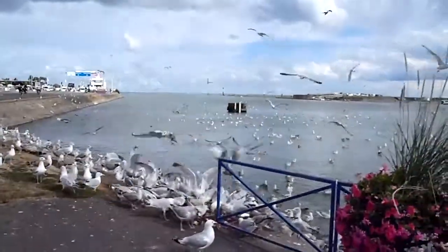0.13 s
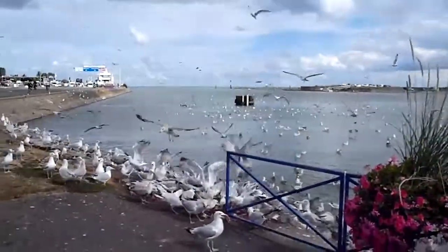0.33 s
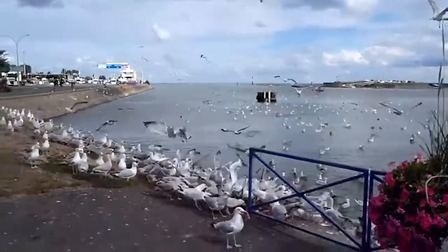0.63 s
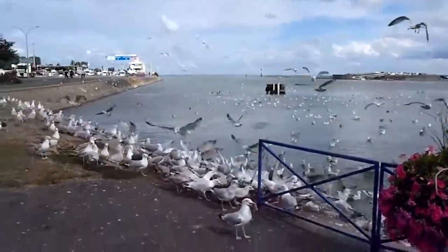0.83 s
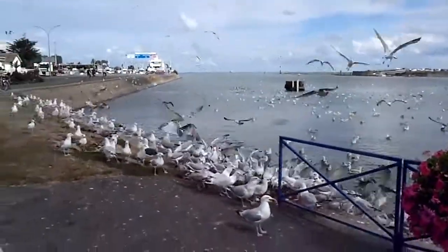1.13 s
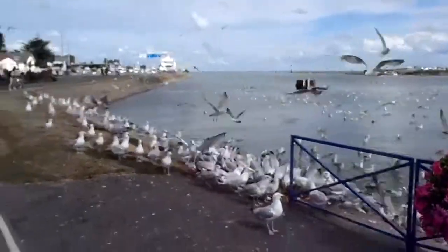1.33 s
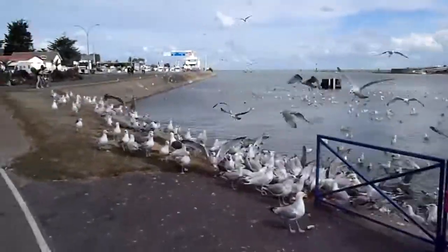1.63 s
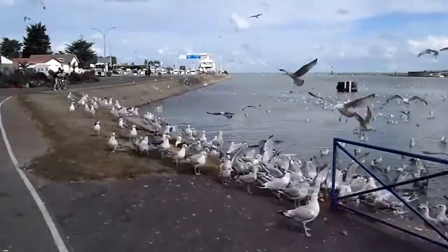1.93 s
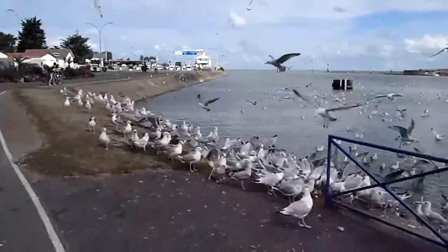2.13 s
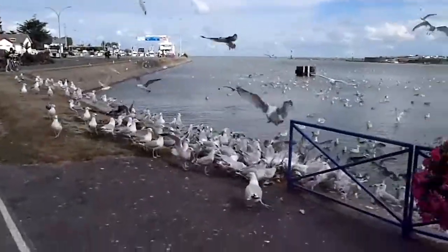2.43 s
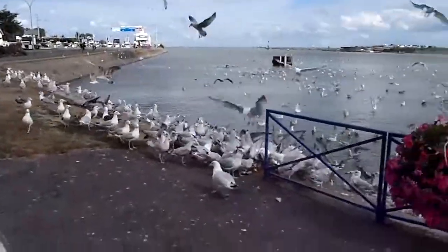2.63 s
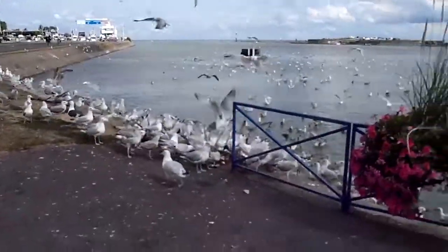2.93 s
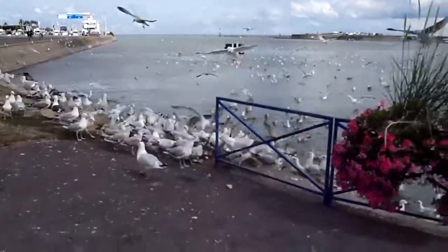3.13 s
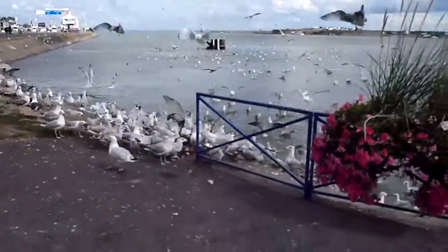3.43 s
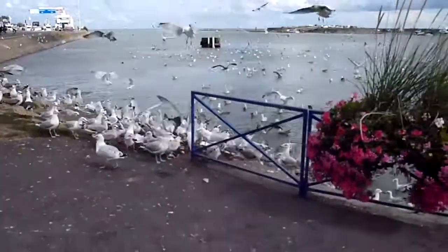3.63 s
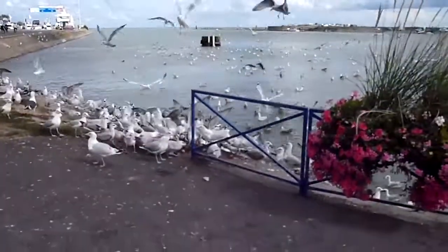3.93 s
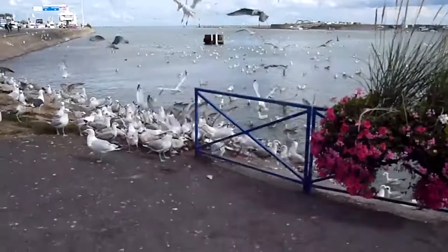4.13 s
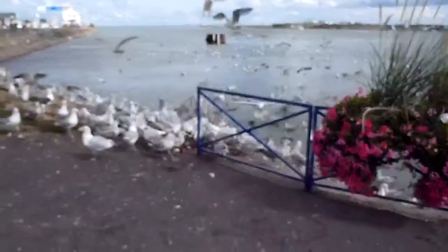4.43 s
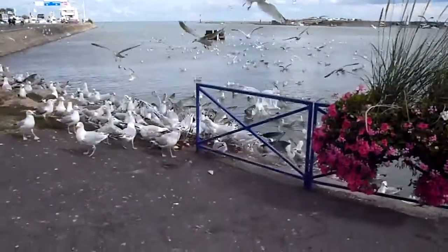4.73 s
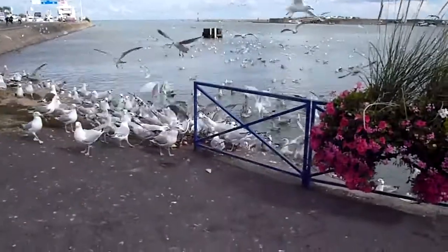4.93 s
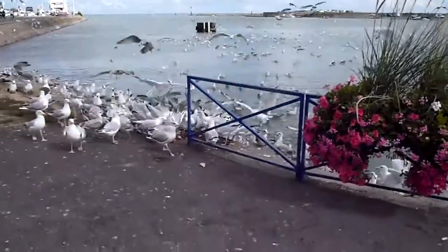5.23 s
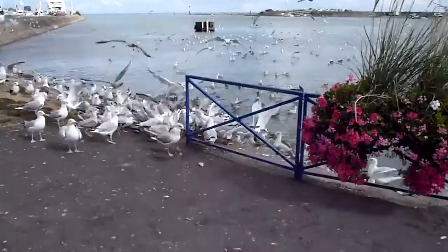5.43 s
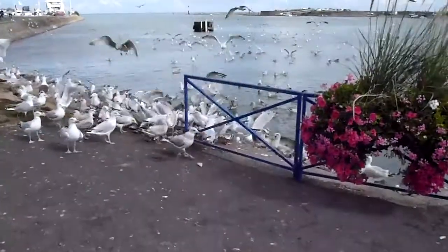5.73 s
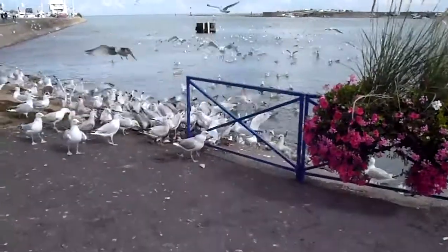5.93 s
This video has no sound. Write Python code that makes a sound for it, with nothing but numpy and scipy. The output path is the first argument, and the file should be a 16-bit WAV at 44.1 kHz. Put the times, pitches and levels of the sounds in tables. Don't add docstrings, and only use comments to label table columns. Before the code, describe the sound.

A dense gull flock calls without pause on an open quay. Very short, raspy squawks and yaps burst from birds a few metres away, mixed with arching whistles and nasal squeals, over a seething bed of many more birds. The sound is bright and piercing. Light wind bumps softly at a small camera microphone, with faint hiss and tiny ticks; only a slight echo comes off the asphalt.

```python
import sys
import numpy as np
from scipy import signal
from scipy.fft import rfft, irfft
from scipy.io import wavfile
from scipy.ndimage import uniform_filter1d

SR = 44100
rng = np.random.default_rng(int(sys.argv[2]) if len(sys.argv) > 2 else 0)


def invert_db(x):
    u = np.asarray(x, float) / 20
    return 10 ** u


def persist_wave(psi):
    counts = np.round(np.clip(psi, -1, 1) * 32767).astype(np.int16)
    wavfile.write(sys.argv[1], SR, np.atleast_2d(counts).T)


N = 267951

# (frequency [Hz], level [dB per Hz])
COLOUR = [(750, -51), (1000, -28), (1200, -24), (1830, -14), (2500, -8), (2900, -5.5), (3180, 3),
          (3400, -5), (3800, -15.5), (4250, -30.5), (4900, -20), (5400, -31.5), (6500, -39.5), (8200, -54),
          (14000, -78.5)]


def evened(x):
    return x / np.sqrt(np.mean(x ** 2) + 1e-20)


def read(points, hz):
    f, value = np.transpose(points)
    return np.interp(np.log(hz + 1), np.log(f + 1), value)


def add(mix, s, sound):
    part = mix[round(s * SR):][:len(sound)]
    part += sound[:len(part)]


def wobble(length, size):
    smooth = uniform_filter1d(rng.standard_normal(length), size)
    return evened(uniform_filter1d(smooth, size))


def shaped(x, gain_db):
    hz, t, z = signal.stft(x, SR, nperseg=512, noverlap=384)
    z = z * invert_db(gain_db(hz[:, None], t))
    return signal.istft(z, SR, nperseg=512, noverlap=384)[1][:N]


def squawk(db, throat_hz, length, beak, rasp_hz=330, width_hz=380, breath=0.08, under_peak_db=-12):
    u = np.linspace(0, 1, round(np.clip(length, .015, .12) * SR))
    pulse_hz = rasp_hz * rng.uniform(.9, 1.1) * (1 + 0.09 * wobble(len(u), size=90))
    turns = np.cumsum(pulse_hz) / SR
    pulses = np.diff(np.floor(turns + 1), prepend=0) * invert_db(0.46 * wobble(len(u), size=40))
    drive = evened(pulses) + breath * rng.standard_normal(len(u))

    t = np.arange(500) / SR
    ring = np.exp(-np.pi * width_hz * t) * np.sin(2 * np.pi * throat_hz * t)
    ring *= np.minimum(t / 0.0013, 1)
    throat = np.convolve(drive, ring)[:len(u)]

    spray_db = np.minimum(read(COLOUR, np.fft.rfftfreq(len(u), 1 / SR)), -13)
    spray = irfft(rfft(drive) * invert_db(spray_db), len(u))
    sound = evened(throat) + beak * evened(spray)
    return invert_db(db + under_peak_db) * sound * np.minimum(u * 40, 1) * np.sqrt(1 - u)


def raspy_calls():
    # (time [s], peak [dB], throat [Hz], length [s], beak opening [0-1])
    squawks = [(0.488, -10.5, 3110, 0.022, 0.3), (0.769, -17.5, 3270, 0.027, 0.1),
               (1.129, -9.5, 3260, 0.022, 0.3), (1.195, -24, 3270, 0.083, 0.6),
               (1.601, -21, 3030, 0.026, 1), (1.621, -10.5, 3350, 0.02, 1), (2.1955, -8, 2980, 0.032, 0.3),
               (2.2986, -6.5, 3090, 0.041, 0), (2.347, -13, 3170, 0.04, 0.15),
               (2.3606, -9.5, 3150, 0.04, 0.22), (2.869, -13.5, 3280, 0.046, 0.8),
               (3.264, -16, 3100, 0.043, 0.8), (3.4087, -11, 3060, 0.059, 0.7),
               (3.9584, -14, 3160, 0.044, 0.3), (4.013, -28.5, 3100, 0.058, 0.6),
               (4.235, -15, 2380, 0.037, 0.97), (4.302, -9, 3240, 0.014, 0.4),
               (4.451, -7.5, 2500, 0.033, 0.1), (4.477, -8, 3210, 0.023, 0.5),
               (4.5875, -13, 3150, 0.032, 0), (5.17, -10, 3150, 0.027, 0.7), (5.6, -9, 3050, 0.027, 0.1),
               (5.7715, -10, 3170, 0.026, 0.6), (5.91, -11.5, 3070, 0.029, 0.9)]
    # (time [s], peak [dB], throat [Hz], length [s])
    yaps = [(0.0434, -9, 3150, 0.022), (0.208, -11.5, 3250, 0.02), (0.287, -13, 3140, 0.024),
            (0.4415, -12.5, 3000, 0.02), (0.872, -12.5, 3160, 0.022), (0.9497, -11.5, 3220, 0.014),
            (0.983, -13.5, 3160, 0.022), (1.256, -10.5, 3220, 0.022), (1.309, -12, 3180, 0.022),
            (1.4975, -7, 3270, 0.02), (1.9385, -10.5, 3130, 0.022), (2.117, -10, 3310, 0.02),
            (2.405, -14.5, 3120, 0.017), (3.3326, -16, 3100, 0.018), (3.646, -12.5, 3010, 0.022),
            (3.6905, -13, 2980, 0.022), (3.883, -10, 2780, 0.012), (4.638, -16, 3110, 0.029),
            (4.729, -13.5, 3160, 0.026), (4.788, -9, 3010, 0.022), (4.8864, -13.5, 3280, 0.025),
            (5.0974, -12, 3270, 0.022), (5.563, -10, 3130, 0.02), (5.633, -12, 3130, 0.025),
            (5.683, -10, 3230, 0.022), (5.9625, -17.5, 3310, 0.026)]
    # (time [s], peak [dB], throat [Hz], length [s])
    chirps = [(0.0583, -33, 5010, 0.02), (0.4429, -33, 4820, 0.02), (0.4923, -33, 4930, 0.02),
              (0.6365, -31, 4800, 0.02), (0.78, -32, 5200, 0.02), (1.1303, -33, 4800, 0.02),
              (1.6023, -31, 4880, 0.02), (1.654, -33, 5060, 0.02), (1.7105, -33, 4760, 0.02),
              (1.8193, -33, 4850, 0.02), (2.0702, -32, 4740, 0.02), (2.296, -31, 4900, 0.02),
              (2.3431, -31, 4790, 0.02), (2.3875, -35, 4870, 0.02), (2.8569, -30, 5030, 0.02),
              (3.0565, -24, 4950, 0.02), (3.2814, -35, 4880, 0.02), (3.622, -35, 5070, 0.02),
              (3.78, -32, 4830, 0.02), (3.845, -27, 4760, 0.02), (4.238, -30, 4750, 0.02),
              (4.2892, -28, 4770, 0.02), (4.6044, -35, 5040, 0.02), (4.6478, -30, 4990, 0.02),
              (4.688, -29, 4860, 0.02), (4.8179, -30, 5050, 0.02), (5.394, -30, 4880, 0.02),
              (5.59, -35, 4720, 0.02), (5.858, -24, 4800, 0.02), (5.9838, -31, 4790, 0.02)]
    calls = list(squawks)
    calls += [(*row, 0.55) for row in yaps]
    calls += [(*row, 0) for row in chirps]
    near = np.zeros(N)
    for s, *call in calls:
        add(near, s - .0015, squawk(*call))
    return near


def cry(length, first_hz, last_hz, lead_db, order, others_db, arch, waver, growth_db,
        flutter_db=1.7, fray_db=1.3, focus_db=-5):
    u = np.linspace(0, 1, round(length * SR))
    glide = first_hz + (last_hz - first_hz) * u
    hz = glide * (1 + 5 * arch * u ** 1.3 * (1 - u))
    middle_hz = hz[len(u) // 2]
    hz = hz * (1 + waver * wobble(len(u), size=200))

    k = np.arange(1, 12)[:, None]
    colour_db = np.maximum(read(COLOUR, k * middle_hz), -53) - read(COLOUR, order * middle_hz)
    db = lead_db + 0.84 * colour_db
    db += np.where(k == order, 0, others_db + focus_db * np.minimum(abs(k - order) - 1, 3))
    db -= 3 * (k < order)
    fray = fray_db * wobble(len(k) * len(u), size=250).reshape(len(k), -1)
    stack = invert_db(db + fray) * np.cos(2 * np.pi * k * np.cumsum(hz) / SR)

    edge = np.minimum(u * length / .005, (1 - u) * length / .01)
    swell = np.minimum(edge, 1) * invert_db(growth_db * (u - .4))
    flutter = invert_db(flutter_db * wobble(len(u), size=200))
    return np.sqrt(2) * stack.sum(0) * flutter * swell


def add_cries(near, calls, order, others_db, arch, waver, growth_db):
    for s, *call in calls:
        add(near, s, cry(*call, order, others_db, arch, waver, growth_db))


def whistles():
    # (start [s], length [s], first pitch [Hz], last pitch [Hz], level [dB])
    arching = [(0.121, 0.068, 3286, 3366, -26), (1.617, 0.048, 3275, 3147, -22),
               (1.965, 0.112, 1857, 1762, -39), (2.012, 0.064, 1498, 1278, -39),
               (2.068, 0.072, 1856, 1752, -38), (2.304, 0.072, 3000, 3000, -23),
               (2.687, 0.1, 2605, 2519, -28), (3.051, 0.1, 5000, 4430, -33), (3.236, 0.07, 5780, 5480, -51),
               (3.321, 0.056, 2565, 2576, -28), (3.405, 0.076, 1846, 1738, -39),
               (3.772, 0.04, 2874, 2925, -26), (3.908, 0.076, 1985, 1880, -36),
               (4.183, 0.084, 1947, 1873, -36), (4.235, 0.044, 2246, 2260, -28),
               (4.467, 0.072, 3396, 3504, -30), (4.471, 0.068, 2419, 2335, -28),
               (4.914, 0.092, 3496, 3392, -32), (5.205, 0.072, 3341, 3343, -28),
               (5.52, 0.06, 3398, 3476, -30)]
    dipping = [(0.284, 0.045, 2900, 3100, -29), (1.514, 0.128, 2521, 2540, -31),
               (1.825, 0.108, 3300, 3220, -23), (2.408, 0.108, 3886, 3700, -38),
               (2.711, 0.208, 1730, 1620, -40), (2.918, 0.084, 3197, 3407, -21),
               (3.226, 0.072, 3540, 3260, -29), (3.453, 0.088, 1525, 1461, -39),
               (3.625, 0.056, 2264, 2390, -34), (4.098, 0.022, 3130, 3080, -15.5),
               (4.18, .035, 3150, 3150, -25), (5.481, 0.104, 1339, 1355, -43),
               (5.848, 0.1, 2301, 2423, -33)]
    sliding = [(0.679, 0.06, 1522, 1267, -41), (0.679, 0.072, 3242, 3279, -25),
               (0.762, .035, 3240, 3230, -19), (1.043, 0.056, 1964, 1962, -35),
               (1.382, 0.036, 2968, 2839, -25), (1.498, 0.04, 3535, 3470, -25),
               (1.715, 0.052, 3230, 3260, -16), (1.801, 0.056, 3136, 3087, -24),
               (3.046, 0.076, 3150, 3240, -24), (5.285, 0.09, 5760, 5600, -49),
               (3.513, 0.052, 3458, 3418, -29), (3.565, 0.04, 3154, 2985, -22),
               (3.888, 0.064, 4665, 4720, -41), (4.622, 0.08, 2440, 2597, -32),
               (4.608, .115, 3650, 3600, -28), (4.715, .06, 3600, 3370, -27),
               (5.014, 0.068, 1530, 1757, -40), (5.357, 0.056, 1690, 1723, -39),
               (5.421, 0.208, 4580, 4540, -49), (5.449, 0.108, 2281, 2169, -37),
               (5.473, 0.044, 2873, 2917, -26), (5.512, 0.052, 2798, 2874, -29),
               (5.95, .128, 3640, 3550, -32), (3.3, .11, 5480, 5420, -48), (5.936, 0.14, 6581, 6541, -51)]
    swelling = [
        (4.013, 0.078, 3090, 3140, -18.5),
        (4.124, 0.05, 3050, 3170, -18),
        (2.19, .095, 3200, 3330, -20),
    ]
    near = np.zeros(N)
    add_cries(near, arching, order=1, others_db=-25.5, arch=.024, waver=.003, growth_db=-3.5)
    add_cries(near, dipping, order=1, others_db=-25.5, arch=-.022, waver=.003, growth_db=-3.5)
    add_cries(near, sliding, order=1, others_db=-25.5, arch=0, waver=.003, growth_db=-3.5)
    add_cries(near, swelling, order=1, others_db=-25.5, arch=-.012, waver=.003, growth_db=6)
    return near


def squeals():
    # (start [s], length [s], first pitch [Hz], last pitch [Hz], leading overtone [dB])
    first_led = [
        (2.922, 0.092, 1535, 1497, -39),
        (4.239, 0.14, 1580, 1500, -37),
        (4.99, 0.271, 1187, 1210, -45),
        (5.329, 0.136, 1325, 1260, -43),
        (5.804, 0.116, 1706, 1279, -40),
        (5.932, 0.148, 1265, 1180, -39),
    ]
    second_led = [(0.636, 0.08, 1217, 1194, -33), (0.659, 0.048, 1410, 1347, -30),
                  (0.739, 0.04, 1438, 1438, -26), (0.887, 0.068, 1405, 1401, -30),
                  (0.935, 0.208, 1090, 990, -38), (1.65, 0.045, 1625, 1600, -22),
                  (2.447, 0.084, 1377, 1336, -29), (2.527, 0.164, 1319, 1310, -27),
                  (2.862, 0.048, 1660, 1576, -22), (3.549, 0.108, 1458, 1336, -30),
                  (3.88, 0.104, 1368, 1290, -28), (4.052, 0.124, 1202, 1211, -35),
                  (4.275, 0.09, 1255, 1224, -29), (4.36, 0.14, 1215, 1217, -30),
                  (4.563, 0.064, 1269, 1265, -30), (4.47, 0.17, 1050, 1010, -41),
                  (4.56, 0.36, 1005, 972, -36.5), (4.902, 0.084, 1564, 1580, -24),
                  (4.918, 0.04, 1458, 1417, -24), (5.293, 0.15, 1400, 1380, -29),
                  (5.373, 0.065, 1235, 1200, -30), (5.728, 0.16, 1381, 1363, -31),
                  (5.9, 0.052, 1595, 1567, -16.5)]
    third_led = [(0.12, 0.1, 1300, 1215, -36), (0.487, 0.09, 1235, 1110, -24),
                 (0.772, 0.097, 1290, 1235, -28), (2.124, 0.04, 1160, 1160, -29),
                 (2.687, 0.056, 1725, 1730, -48), (3.445, 0.09, 1170, 1090, -28),
                 (3.764, 0.088, 1215, 1215, -40), (3.864, 0.048, 1292, 1297, -38),
                 (5.034, 0.086, 1190, 1090, -24), (5.205, 0.084, 1290, 1280, -42),
                 (5.37, 0.085, 1225, 1100, -29), (5.9, 0.1, 1290, 1215, -39)]
    fourth_led = [
        (0.628, 0.1, 1195, 1255, -42),
        (1.063, 0.05, 1401, 1317, -51),
        (5.365, 0.08, 1235, 1150, -40),
        (5.592, 0.096, 1178, 1186, -39),
        (5.795, 0.1, 1310, 1160, -39),
    ]
    warbling = [
        (1.127, 0.026, 1640, 1610, -38),
        (1.15, 0.085, 1545, 1545, -37),
        (1.228, 0.045, 1530, 1400, -41),
        (2.86, .1, 1700, 1720, -45),
        (5.13, .17, 1335, 1310, -41),
        (5.3, .13, 1340, 1300, -44),
    ]
    wails = [
        (3.607, .04, 1280, 1280, -34),
        (3.635, .04, 1335, 1325, -40),
        (3.68, .13, 1500, 1380, -44),
        (3.8, .15, 1380, 1340, -42),
        (3.94, .06, 1345, 1195, -39),
    ]
    near = np.zeros(N)
    add_cries(near, first_led, order=1, others_db=-10, arch=-.015, waver=.005, growth_db=-3.5)
    add_cries(near, second_led, order=2, others_db=-5, arch=0, waver=.003, growth_db=-3.5)
    add_cries(near, third_led, order=3, others_db=-3.5, arch=.042, waver=.0015, growth_db=0)
    add_cries(near, fourth_led, order=4, others_db=-7, arch=.015, waver=.003, growth_db=-1)
    add_cries(near, warbling, order=3, others_db=-3, arch=.005, waver=.012, growth_db=-2)
    add_cries(near, wails, order=3, others_db=-4, arch=-.005, waver=.004, growth_db=-1)
    return near


def ground(x, echo_s=0.0037, share=0.075):
    taps = np.zeros(SR // 100)
    taps[[0, round(echo_s * SR)]] = 1, share
    return signal.oaconvolve(x, taps)[:N]


def bird(calls_per_s=12, spread_db=2, raspy_share=.52, rasp_hz=300, tone_db=14, warble=.011):
    pace = 1 + .3 * np.clip(wobble(N, size=9000), -2, 2)
    beats = rng.random() + np.cumsum(calls_per_s * pace) / SR
    call, u = beats.astype(int), beats % 1
    pitch, loud, kind, rate, bend, *tone = rng.random((call[-1] + 1, 11)).T
    tone_level = tone_db * np.array(tone) - spread_db * np.log(loud + 0.046)
    tone = invert_db(tone_level).astype(np.float32)

    shake = wobble(N, size=350)
    contour = 1 + .2 * u * (1 - u) + (.08 - .2 * bend)[call] * u + warble * shake
    hz = (950 + 700 * pitch)[call] * contour
    angle = (2 * np.pi * (np.cumsum(hz) / SR % 1)).astype(np.float32)
    stack = sum(g[call] * np.cos((k + 1) * angle) for k, g in enumerate(tone))

    rough = shake[::-1]
    chops = np.cumsum(rasp_hz * (.6 + .8 * rate)[call] * (1 + .08 * rough)) / SR
    chopped = 2.8 * np.exp(-(chops % 1) / .2)
    rasp = np.where((kind < raspy_share)[call], chopped, 1 + .3 * rough)
    opening = np.clip(u / .06, 0, 1) * np.clip((.8 - u) / .15, 0, 1)
    return stack * rasp * opening


def crowd(count=18, blur=.14, level_db=-23.5, low_follows=0.13, low_opens=.3, chatter_db=1.38):
    # (time [s], loudness [dB], beak opening [dB])
    excitement = [(0, -22.5, -6.5), (.5, -24, 1.5), (0.871, -23, 0.5), (1.119, -23.5, -2), (1.55, -23, 6),
                  (1.75, -22, -2), (2.1, -24.5, 3), (2.601, -22, 0.5), (2.98, -23, 0.5), (3.17, -22.5, -6),
                  (3.45, -22, 1.5), (3.93, -23, 2), (4.08, -27, -5.5), (4.301, -26, 4.5), (4.8, -22.5, 1.5),
                  (5.25, -25.5, 2), (5.6, -25.5, -0.5), (6.08, -23.5, 1.5)]
    s, loud_db, beak_db = np.transpose(excitement)
    voices = evened(sum(bird() for _ in range(count))) + blur * rng.standard_normal(N)
    hz, power = signal.welch(voices, SR, nperseg=128)

    def gain_db(f, t):
        loud = np.interp(t, s, loud_db - loud_db.mean())
        beak = np.interp(t, s, beak_db - beak_db.mean())
        low = (low_opens * beak - (1 - low_follows) * loud) * np.clip((2900 - f) / 300, 0, 1)
        bright = beak * np.clip((f - 3800) / 500, 0, 1)
        flat = -10 * np.log10(np.interp(f, hz, power / power.max()))
        return flat + read(COLOUR, f) + loud + low + bright

    chatter = invert_db(chatter_db * wobble(N, size=500))
    return invert_db(level_db) * evened(chatter * shaped(voices, gain_db))


def wind(lull_db=-61.5, lumpy_db=2.0):
    # (frequency [Hz], level [dB per Hz])
    rumble_colour = [
        (15, -22.5),
        (30, -0.5),
        (55, 3.5),
        (150, -2),
        (220, -7.5),
        (650, -11.5),
        (1000, -40.5),
        (2500, -91.5),
    ]
    # (middle [s], half length [s], level [dB])
    gusts = [(0.0, 0.061, -53), (0.61, 0.18, -46.5), (1.005, 0.2, -47), (1.575, 0.23, -51),
             (2.092, 0.098, -38), (2.841, 0.16, -54), (3.41, 0.092, -48.5), (3.838, 0.11, -49.5),
             (4.295, 0.27, -59.5), (4.904, 0.33, -55), (5.36, 0.15, -48.5), (5.743, 0.086, -49),
             (5.998, 0.36, -55.5)]
    t = np.arange(N) / SR
    colour = invert_db(read(rumble_colour, np.fft.rfftfreq(N, 1 / SR)))
    rumble = evened(irfft(rfft(rng.standard_normal(N)) * colour, N))
    swell = invert_db(lull_db)
    for s, half, db in gusts:
        swell = swell + invert_db(db) * np.exp(-((t - s) / half) ** 2)
    return rumble * swell * invert_db(lumpy_db * wobble(N, size=1200))


def scene():
    near = raspy_calls() + whistles() + squeals()
    return (ground(near) + crowd() + wind())[None]


def preamp_hiss(level_db=-51, patch_db=3.6):
    # (frequency [Hz], level [dB per Hz])
    hiss_colour = [
        (200, 3.5),
        (320, 1.5),
        (600, 3),
        (850, 4),
        (3000, -6),
        (7000, -34),
        (10000, -21.5),
        (14000, -27),
    ]

    def hiss_db(f, t):
        patches = rng.standard_normal((len(f), len(t)))
        patches = uniform_filter1d(patches, size=12, axis=0)
        patches = uniform_filter1d(patches, size=16, axis=1)
        return read(hiss_colour, f) + patch_db * evened(patches)

    return invert_db(level_db) * evened(shaped(rng.standard_normal(N), hiss_db))


def tiny_ticks():
    # (time [s], peak [dB])
    tick_rows = [(-0.0012, -36), (6.0745, -40), (0.1411, -43), (0.1645, -48), (0.2109, -43), (0.2458, -49),
                 (0.4893, -49), (0.7911, -41), (1.1278, -49), (1.51, -49), (1.5953, -49), (1.6272, -42),
                 (2.3236, -38), (2.3705, -43), (2.8579, -50), (2.9622, -48), (3.0784, -40), (3.241, -43),
                 (4.0302, -51), (4.0537, -49), (4.0766, -46), (4.1001, -46), (4.1699, -42), (4.2398, -47),
                 (4.263, -45), (4.3091, -49), (5.1796, -41), (5.475, -48), (5.905, -45)]
    ticks = np.zeros(N)
    for s, db in tick_rows:
        add(ticks, s + .0012, invert_db(db + 14) * np.array([1, -.1]))
    return ticks


def low_pass(x):
    return signal.sosfilt(signal.butter(12, 14700, fs=SR, output="sos"), x)


def record(dry):
    mix = dry + preamp_hiss() + tiny_ticks()
    return low_pass(mix)


dry = scene()
out = record(dry)
persist_wave(out)
```